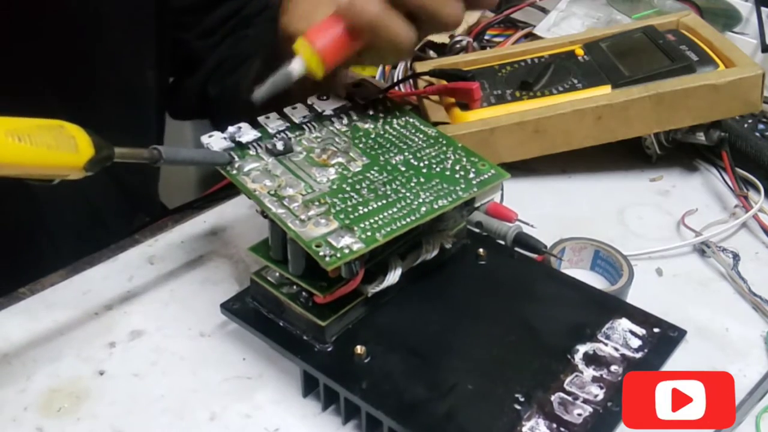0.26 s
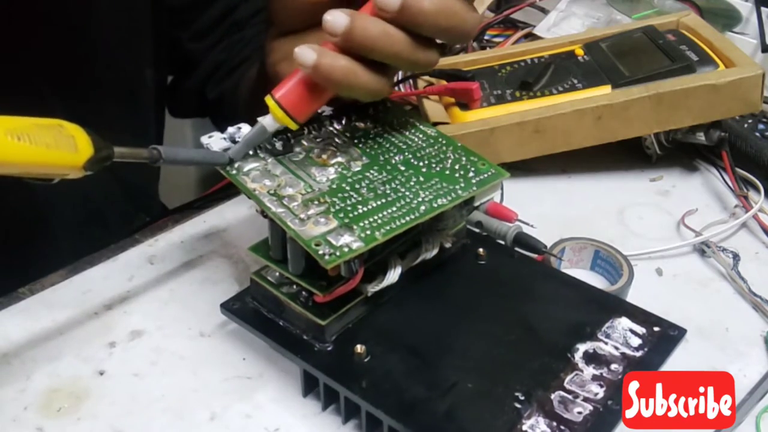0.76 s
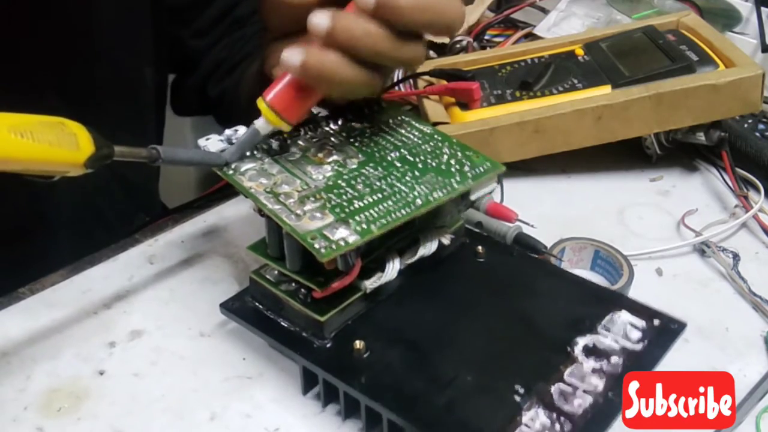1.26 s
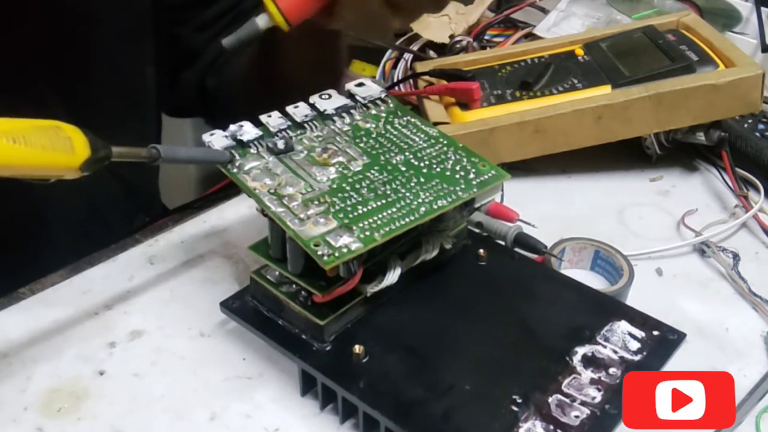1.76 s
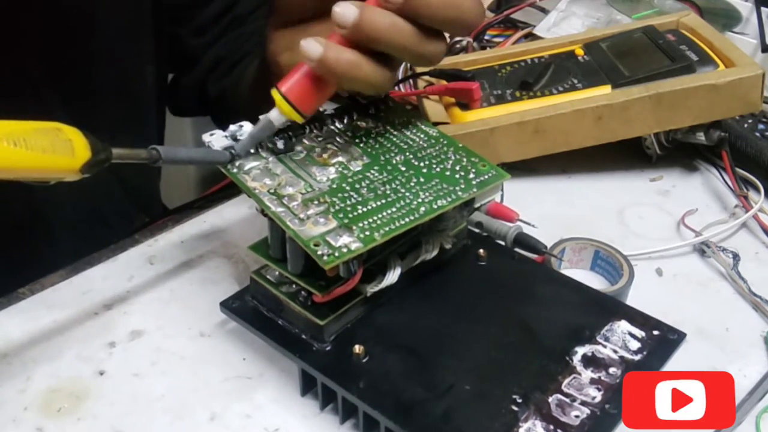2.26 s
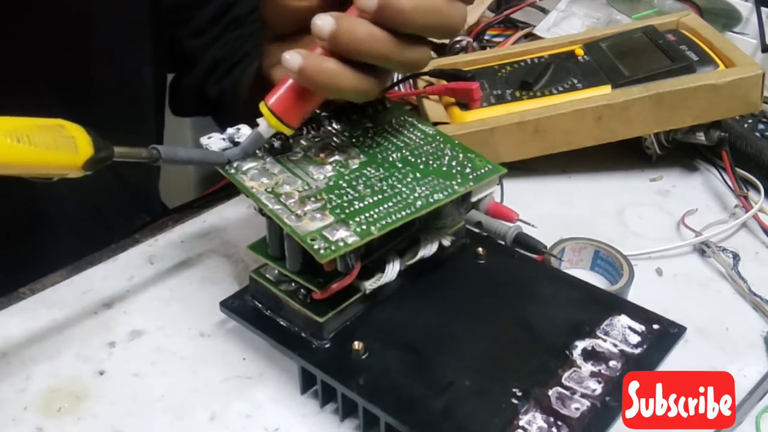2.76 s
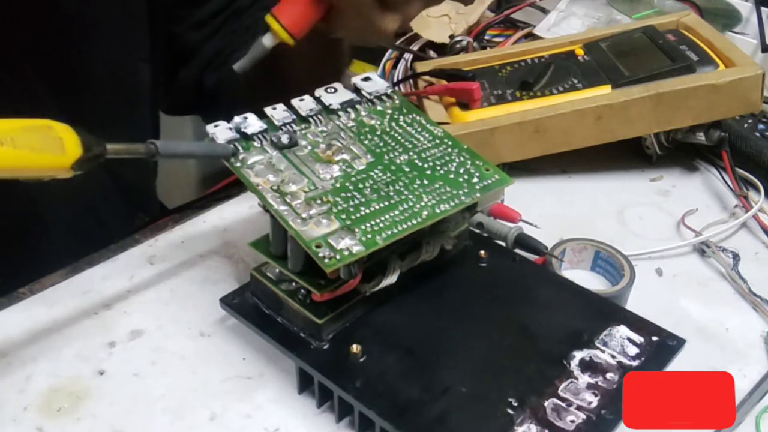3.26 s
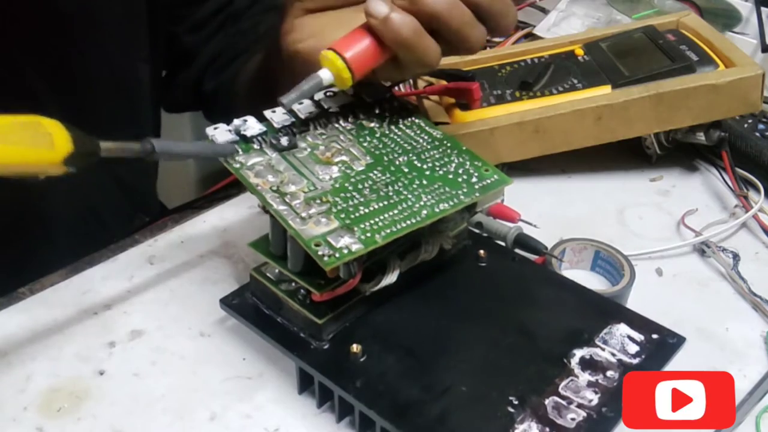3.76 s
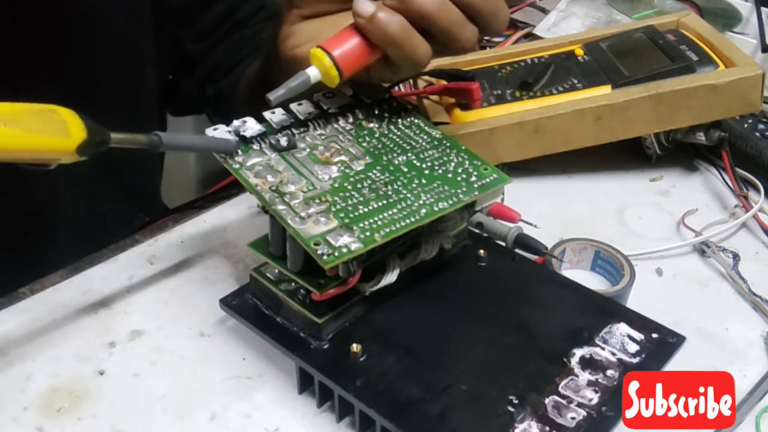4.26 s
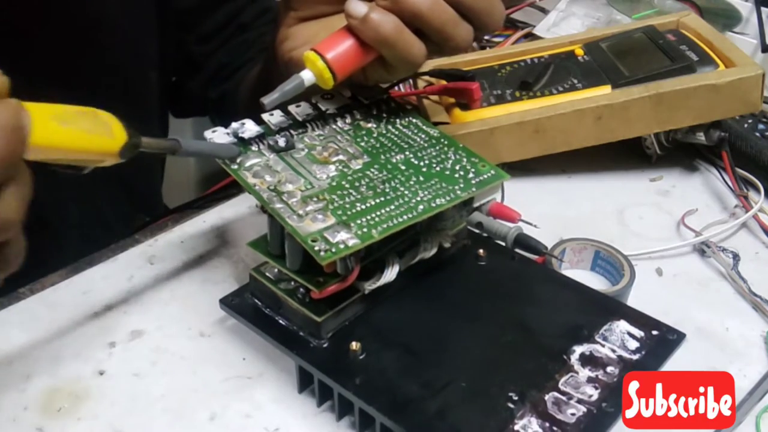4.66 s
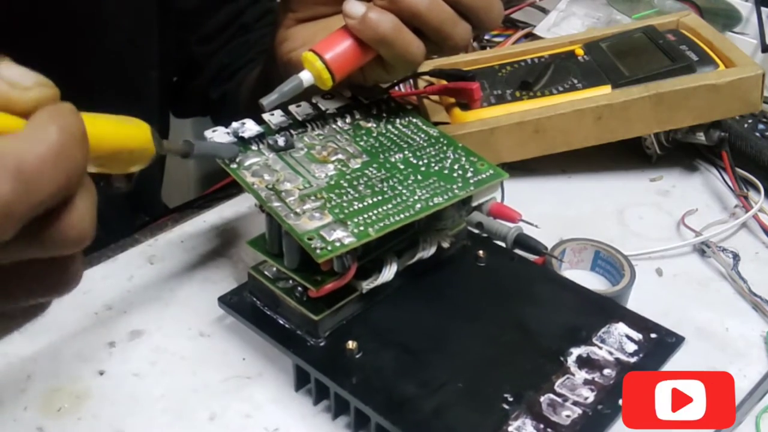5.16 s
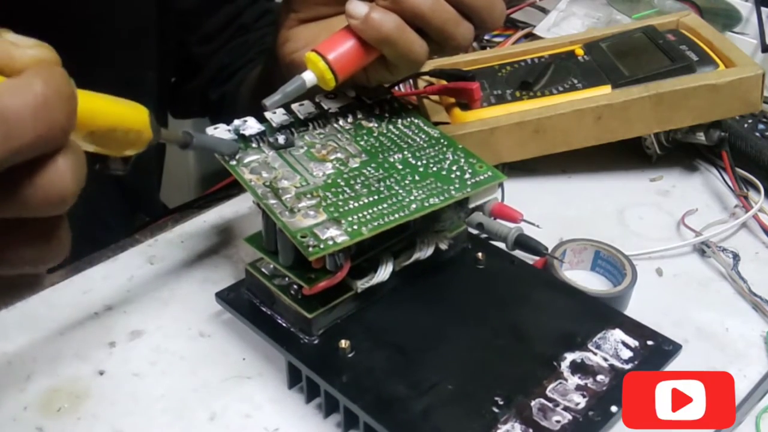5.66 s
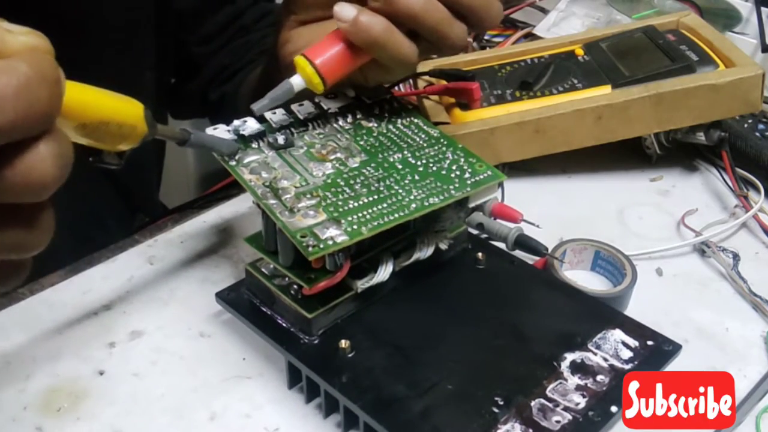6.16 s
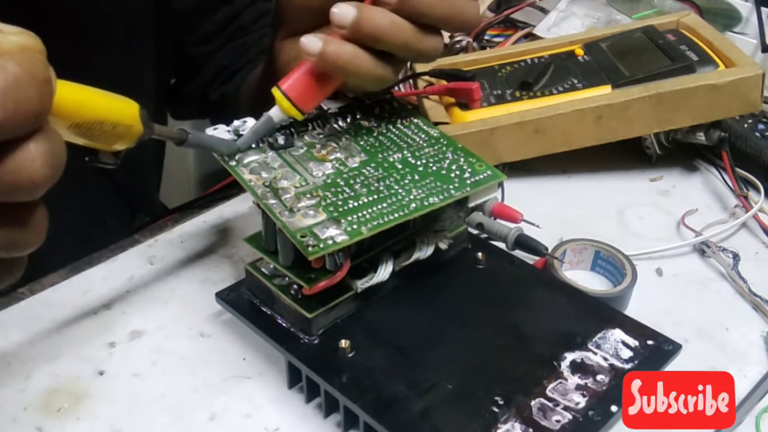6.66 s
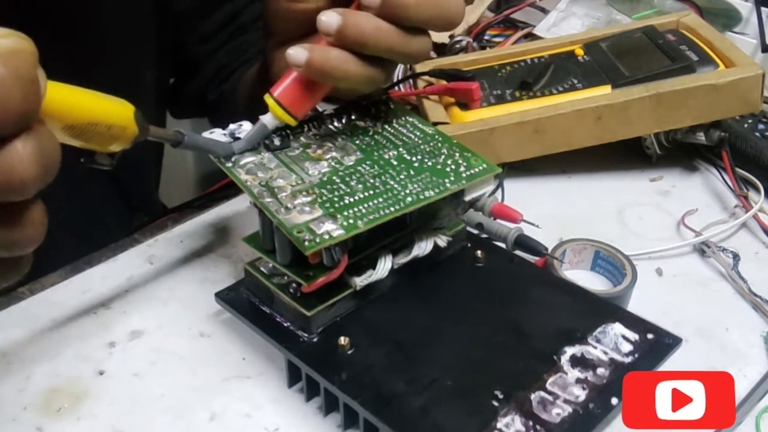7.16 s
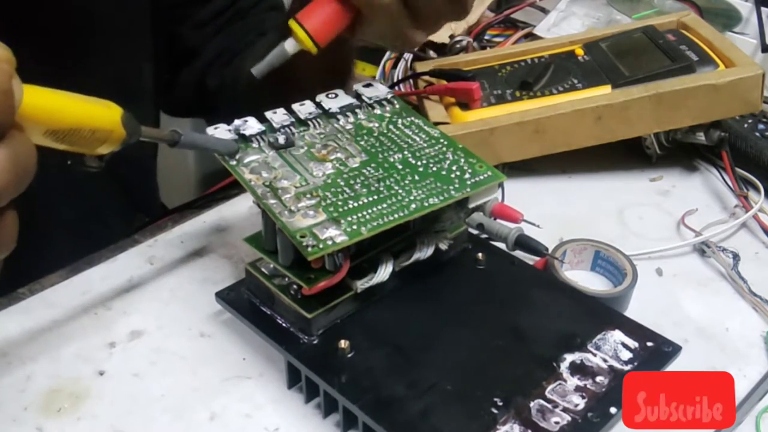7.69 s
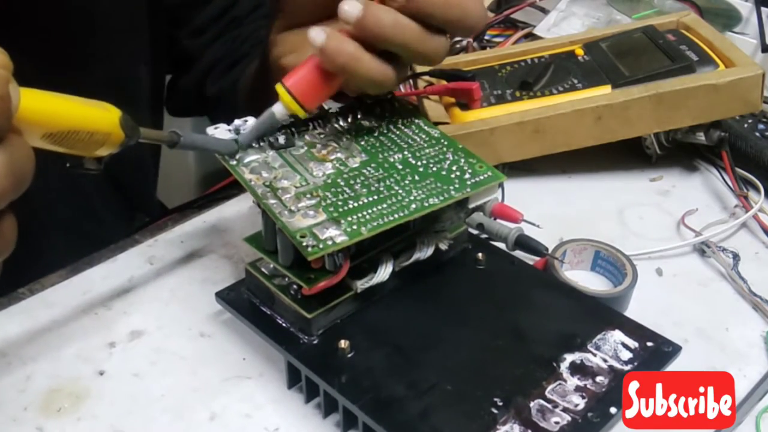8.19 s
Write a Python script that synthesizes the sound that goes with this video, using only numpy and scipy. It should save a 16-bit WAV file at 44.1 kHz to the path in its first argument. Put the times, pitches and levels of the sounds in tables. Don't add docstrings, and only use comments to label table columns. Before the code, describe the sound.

Close at a workbench in a small hard room, a spring-loaded solder pump snaps sharply as it is cocked, its plunger knocking back a moment later. Then come short air gulps, clanks and ringing metal fins, dull taps and scrapes on a circuit board. Quieter ticking and scraping fills the middle; late, a heavy thud and bright clank, then one last crack. Faint hum and fan hiss continue beneath, picked up by a nearby phone.

```python
import sys
import numpy as np
from scipy import signal
from scipy.fft import rfft, irfft, next_fast_len
from scipy.io import wavfile
from scipy.ndimage import uniform_filter1d

SR = 44100
rng = np.random.default_rng(int(sys.argv[2]) if len(sys.argv) > 2 else 0)


def volts_from_db(level):
    exponent = np.asarray(level, float) / 20
    return 10 ** exponent


def inscribe(sig):
    pcm = np.round(np.clip(np.atleast_2d(sig).T, -1, 1) * 32767)
    wavfile.write(sys.argv[1], SR, pcm.astype(np.int16))


N = 371763

# pitch_hz, level_db
HUM = [(97, -81.5), (199.2, -75.5), (298.8, -82.5), (398.4, -66), (597.6, -78.5)]
# pitch_hz, level_db
RUMBLE = [(25, -25), (50, -16.5), (90, -8), (190, -8), (300, -10.5), (500, -12.5), (800, -16), (1300, -19)]
# pitch_hz, level_db
HISS = [(1630, -18.5), (2290, -20), (2700, -14.5), (3220, -24), (4570, -23.5), (6000, -29), (8100, -34),
        (10000, -35.5), (12000, -24), (14900, -34), (16000, -27.5), (16500, -62)]
# pitch_hz, likeness_0_to_1
HISS_LIKENESS = [(60, 0), (130, 1), (290, 0.7), (640, 0), (1410, 0.05), (3100, 0.2), (6820, 0.05),
                 (15000, 0)]
# pitch_hz, left_minus_right_db
HISS_BALANCE = [(60, -0.5), (110, 0.5), (200, 3.5), (380, -1), (700, 0.5), (1290, 1), (2380, -0.5),
                (4400, 0), (8120, -0.5), (15000, 9.5)]
# time_s, treble_rise_db
RUSTLE = [
    (.3, 0.5),
    (1.699, 7.5),
    (4.6, 0.5),
    (8, 2.5),
]
HISS_DB, RUSTLE_S = -61, 0.29

# time_s, peak_1.5_to_7khz_db, peak_7_to_16khz_db, left_minus_right_db
LATCH_CRACKS = [
    (0.0444, -13, -18.5, -2),
    (1.7945, -16, -17, -8.5),
    (3.3912, -14.5, -17.5, -6),
    (7.82, -18, -18.5, -9.5),
]
# pitch_hz, level_db
LATCH_COLOUR = [(500, -15.5), (1200, -50), (2000, -32.5), (2600, -11.5), (3300, 4), (3900, -1.5),
                (4500, -4), (5100, -3), (5600, -12), (7000, -18), (8700, -10), (10500, -6), (11900, 1.5),
                (12800, -3), (14400, -2), (16000, -16.5)]
# level_db, pitch_hz, t60_s
LATCH_MODES = [(-3, 2900, .008), (5.5, 3250, .01), (8, 3600, 0.01), (4, 4050, 0.011), (2, 4750, 0.012),
               (-7, 6300, .008), (-9, 11900, .02)]
# level_db, pitch_hz, t60_s
LATCH_THUD, LATCH_KNOCK = (-20.5, 179, 0.065), (-15, 710, 0.0047)
LATCH_RINGS_S = 0.0012

# time_s, peak_db, peak_7_to_16khz_db
REBOUNDS = [
    (0.1405, -26.5, -32),
    (1.9075, -27, -29),
    (3.5098, -26, -32),
    (3.5125, -39, -33),
    (7.9316, -29, -41.5),
]
# level_db, pitch_hz, t60_s
REBOUND_THUD, REBOUND_KNOCK = (-22, 232, 0.137), (1, 527, 0.019)
REBOUND_PAN_DB = 7
THUD_LEADS_S = 0.006

# time_s, peak_1.5_to_7khz_db, peak_7_to_16khz_db
TICKS = [(0.1527, -38, -28), (0.297, -46, -39.5), (0.352, -52, -47), (0.411, -49, -40.5),
         (0.518, -46.5, -44), (0.54, -47.5, -39), (1.065, -22, -23.5), (2.6978, -25.5, -29),
         (2.702, -31, -28), (4.39, -51, -43), (4.6436, -31, -43), (5.39, -50, -50), (7.024, -48, -47),
         (7.0485, -23, -21.5), (7.0554, -28, -35), (7.9867, -41, -37.5), (8.073, -52, -45)]
# pitch_hz, level_db
TICK_COLOUR = [(290, -10), (500, -8), (729, -20), (1130, -11), (2540, -6.5), (3810, -5.5), (8090, -14),
               (11100, -3), (12100, -0.5), (14900, -1), (16000, -25.5)]
TICK_PAN_DB = -10.5

# time_s, peak_db, left_minus_right_db
TAPS = [(1.0432, -43, 6), (1.1485, -36, 3), (1.279, -37.5, 0), (1.4539, -35, -5), (2.769, -33.5, 8),
        (3.0804, -24, 0), (3.0905, -36, -2), (3.243, -31.5, 5), (3.2814, -35.5, 1), (3.704, -34, 0),
        (4.338, -48, 2), (4.7758, -41.5, 0), (4.8228, -32, -7), (4.8901, -39, 4), (4.9872, -43, 4),
        (5.941, -42.5, 6), (6.8946, -41, 2), (6.9058, -40.5, 10.5), (7.6556, -35, 2), (7.6906, -38, 4)]
TAP_TREBLE_DB = -13

# time_s, peak_1.5_to_7khz_db, peak_7_to_16khz_db
CLANKS = [(1.318, -18, -25), (1.3275, -27, -43), (1.3343, -22, -36), (1.349, -29.5, -49),
          (1.3734, -30, -32), (1.477, -30.5, -60), (1.622, -35.5, -75), (2.908, -30.5, -55.5),
          (2.9175, -15, -26), (2.923, -16, -40), (2.998, -15, -16.5), (3.0298, -24, -33),
          (3.1358, -30, -37.5), (3.1901, -22.5, -28.5), (3.7426, -21.5, -41), (7.2782, -31, -33),
          (7.2829, -10.5, -15.5), (7.4081, -31, -43)]
# pitch_hz, level_db
CLANK_COLOUR = [(300, -12), (800, -9), (1500, -6.5), (2200, -3), (3500, -2.5), (5500, 0), (7500, -9),
                (9000, -19.5), (10500, -12.5), (12000, -7.5), (13500, -16), (14800, -9), (16000, -17.5)]

# time_s, peak_db, pitch_hz
PUMP_THUDS = [(1.064, -32, 111.4), (1.076, -33.5, 151), (1.1465, -40.5, 150), (1.29, -30, 132),
              (1.309, -32, 188), (1.329, -28.5, 181), (1.472, -36, 166), (2.69, -41, 170),
              (2.708, -31.5, 147), (2.76, -39, 187), (2.795, -44.5, 181), (2.887, -31, 119),
              (2.916, -23.5, 181), (2.993, -33.5, 172), (3.078, -36, 152), (3.688, -41.5, 175),
              (3.703, -34, 127), (3.745, -36, 188.5), (6.901, -29.5, 316), (6.915, -38.5, 133),
              (7.047, -30.5, 127), (7.109, -39, 137), (7.244, -37, 166), (7.281, -33, 265.7),
              (7.649, -47.5, 143)]
# time_s, peak_db, pitch_hz
IRON_THUDS = [(4.339, -34, 223), (4.641, -36, 242), (4.695, -38, 240), (4.778, -46, 233), (4.825, -39, 242),
              (4.892, -31, 171), (4.949, -44.5, 192), (5.151, -43, 220), (5.212, -41.5, 207),
              (5.687, -48.5, 170), (5.935, -51, 192)]
# time_s, peak_db, pitch_hz
KNOCKS = [(1.0715, -24.5, 512), (1.084, -36, 497), (1.092, -37, 470), (1.124, -46, 590), (1.146, -44, 455),
          (1.279, -41.5, 503), (1.318, -30, 735), (1.62, -47, 1110), (2.7005, -33.5, 560),
          (2.768, -42.5, 450), (2.889, -46, 600), (2.915, -30.5, 603), (2.997, -37, 907), (3.187, -57, 603),
          (3.74, -34.5, 1120), (2.7843, -48, 1130), (4.388, -46.5, 1110), (4.603, -38, 1270),
          (4.632, -31.5, 450), (4.652, -30.5, 497), (4.675, -37.5, 438), (4.706, -42, 398),
          (4.727, -42, 400), (4.775, -39, 545), (4.822, -42.5, 453), (5.94, -44.5, 496), (6.898, -38, 650),
          (7.048, -28.5, 524), (7.057, -34.5, 460), (7.076, -43, 400), (7.104, -46, 905), (7.283, -24, 430),
          (7.689, -42.5, 1100)]
PUMP_CYCLES, IRON_CYCLES, KNOCK_T60_S = 14.6, 17.8, 0.04
# time_s, peak_db, pitch_hz, t60_s
SLAM = [
    (7.2833, -9.5, 225, 0.048),
    (7.2833, -19.5, 192.8, 0.15),
]
# time_s, peak_db
TIP_FLICKS = [(2.7846, -33.5), (2.7935, -40), (2.8045, -49), (4.6034, -44), (4.6463, -30.5),
              (7.1092, -29.5), (7.114, -43), (7.119, -34), (7.2823, -18), (7.4086, -35.5)]
TIP_HZ, TIP_T60_S, TIP_LAGS_S = 2068, 0.037, 0.001
CLIP_HZ = [10600, 6535, 4190, 5600, 14810, 7250, 8400, 11610, 4600]
# time_s, peak_db, t60_s
CLIPS = [
    [(1.374, -37.5, 0.16), (2.93, -52, .2), (3.003, -45, .2), (3.03, -36, .2), (3.189, -36, 0.041),
     (3.743, -42.5, 0.11)],
    [(2.917, -46, .2), (3.081, -37, .12), (7.283, -40, 0.56)],
    [(1.319, -52, 0.088), (2.998, -39, 0.14), (7.283, -16.5, 0.032)],
    [(7.285, -32, .15), (1.322, -38, .12), (2.92, -38, .1)],
    [(1.319, -47, .13), (2.9965, -13, 0.036), (3.002, -31, 0.13), (3.14, -55, 0.11)],
    [(2.925, -45, .09), (3.03, -50, .2)],
    [(1.319, -40, 0.066), (2.92, -44, .16), (3.0, -43, 0.22), (3.081, -50, .15), (7.284, -57, 0.13)],
    [(2.935, -43.5, 0.24), (3.137, -50, .08)],
    [(1.521, -41, 0.044), (1.477, -49, .04)],
]

# pitch_hz, t60_s, level_db
ROOM = [(152, 0.23, -2.5), (470, 0.25, -2.5), (1500, 0.18, -2.5), (3960, 0.46, -20), (8000, 0.25, -5.5),
        (12940, 0.073, -3.5)]
FINS_ROOM_DB = -22

# time_s, level_db
WHINE = [
    (.9, -76),
    (2.6, -79),
    (6.1, -76),
]
WHINE_HZ, WHINE_S = 6100, 0.15

# opens_s, fastest_s, stops_s, level_db, whistle_db
GULPS = [
    (1.06, 1.06, 1.146, -38, -12),
    (2.675, 2.696, 2.78, -38, -11),
    (7.019, 7.052, 7.125, -34.5, -15.5),
]
# pitch_hz, level_db
GULP_COLOUR = [(590, -22.5), (1000, -2.5), (1160, -1.5), (1790, -12), (2030, -4), (3980, 5), (9060, -10),
               (14600, -12), (16000, -5)]
RATTLE_DB = -5

# left_minus_right_db, left_leads_radians,
# then corner_db, flank_db, fin_edge_db, base_db, foot_db, fin_tip_db when struck there
FIN_MODES = [(-7.5, 0.13, -41, -36, -31, -37, -44, -50), (5, 1.2, -53, -50, -30.5, -61, -46, -41),
             (-6, 0.52, -54, -47, -29.5, -33, -39, -57), (5, 0.33, -58, -56, -40, -45, -58, -60),
             (3.5, 0.56, -39, -36.5, -26, -33.5, -54, -57), (1, 1.5, -60, -43, -45, -58, -50, -58),
             (-14, -1.5, -52, -48, -37, -38, -44, -55), (-3, 0.2, -61, -50, -35, -54, -48, -55),
             (-8, 0.1, -60, -57, -51, -50, -52, -74), (4.5, 1.8, -44, -48, -42, -60, -71, -55),
             (15, 1.6, -62, -55, -35.5, -63.5, -63, -48), (14, -1.7, -46, -54, -38, -61, -47, -49),
             (14, -0.21, -59, -61, -23, -76, -45, -38), (4.5, 1.1, -59, -58, -44, -80, -62, -54)]
FIN_HZ = [4910, 5012, 5085, 5405, 5657, 6380, 6595, 6654, 7983, 9790, 9848, 12058, 12113, 14845]
FIN_T60 = [0.38, 0.27, 0.49, 0.21, 0.34, 0.22, 0.37, 0.22, 0.65, 0.42, 0.78, 0.19, 0.31, 0.16]
# time_s, strength_db, muted_after_s (by a hand or tool)
BLOWS = [
    [(1.318, 0, 0.25), (1.476, -18.5, .14), (1.621, -25, 0.06)],
    [(2.917, 1.5, 0.075)],
    [(2.998, -1, 0.11)],
    [(3.7, -31, .04), (3.743, -0.3, .5)],
    [(7.283, 1, 0.12), (7.408, -23.5, 0.13)],
    [(3.136, -1.7, .07)],
]
SPOT_SHARES = [0.75, 0.9, 0.98, 1.05, 0.66, .9]
BUZZ_DB, BUZZ_PER_S = 2, 110

# start_s, hardest_s, end_s, scrape_db, rumble_db
DRAGS = [
    (2.923, 2.997, 3.34, -48.5, -49),
    (3.674, 3.706, 3.57, -53.5, -46.5),
    (4.382, 4.57, 4.807, -48.5, -43.5),
    (4.77, 4.963, 5.3, -66, -60.5),
    (7.613, 7.708, 7.9, -59, -53.5),
]
# pitch_hz, level_db
BOARD_COLOUR = [(500, -15), (800, -10.5), (1300, -8.5), (1700, -6), (2100, -1.5), (2800, -5), (3600, -6.5),
                (4600, -12.5), (5200, -15.5), (9000, -27.5), (16000, -25.5)]
STROKE_ENDS_DB, RUMBLE_LAG = -16.5, 0.58

# pitch_hz, left_minus_right_db
PORT_BALANCE = [(100, 2), (300, 0.5), (1500, 3), (2500, 0), (3600, -1.5), (5000, -6), (7000, -5.5),
                (9000, 6), (11000, 20.5), (13000, 25), (15500, 5)]
# pitch_hz, left_leads_radians
PORT_LEAD = [(100, 0.2), (500, 0.35), (1300, 1.59), (2500, 1.89), (3400, 1.55), (4700, 2), (6300, 5),
             (7500, 4), (9500, 8), (12000, 3.2), (16000, 3)]


def table(points, size):
    hz, value = np.transpose(points)[:2]
    return np.interp(np.log(np.fft.rfftfreq(size, 1 / SR) + 1), np.log(hz), value)


def colour(x, points):
    y = irfft(rfft(x) * volts_from_db(table(points, x.shape[-1])), x.shape[-1])
    return y / y.std(axis=-1, keepdims=True)


def band(x, lo_hz, hi_hz):
    y = signal.sosfilt(signal.butter(2, [lo_hz, hi_hz], "band", fs=SR, output="sos"), x)
    return y / y.std(axis=-1, keepdims=True)


def walk(rate):
    k = int(SR / rate)
    steps = np.repeat(rng.standard_normal(N // k + 1), k)
    y = uniform_filter1d(uniform_filter1d(steps, k), k)[:N]
    return y / y.std()


def click(points, size):
    fold = irfft(np.log(volts_from_db(table(points, size))), size)
    fold[1:size // 2] *= 2
    fold[size // 2 + 1:] = 0
    return irfft(np.exp(rfft(fold)), size)


def add(out, x, s, pan_db):
    i = int(s * SR)
    x = x[:N - i]
    out[:, i:i + len(x)] += x * volts_from_db(np.array([[pan_db], [-pan_db]]) / 2)


def follows(events, rule, early_s=0):
    return [(e[0] - early_s, e[1] + rule[0], *rule[1:]) for e in events]


def background():
    size, t = next_fast_len(N), np.arange(N) / SR
    like = np.clip(table(HISS_LIKENESS, size), 0, 1)
    mid, side = rfft(rng.standard_normal((2, size))) * np.sqrt([1 + like, 1 - like])
    lean = table(HISS_BALANCE, size) / 2
    both = np.array([(mid + side) * volts_from_db(lean), (mid - side) * volts_from_db(-lean)])
    both *= volts_from_db(table(RUMBLE + HISS, size))
    both *= volts_from_db(HISS_DB) / irfft(both.mean(0), size).std()

    rustle_db = sum(db * np.exp(-((t - s) / RUSTLE_S) ** 2) for s, db in RUSTLE)
    octave = np.log2(np.fft.rfftfreq(size, 1 / SR) / 30 + 1e-9)
    swell, out = walk(1.5), 0
    for k in range(10):
        share = np.cos(np.clip(octave - k, -1, 1) * np.pi / 2) ** 2
        breath_db = 0.5 * swell + 1.9 * walk(15)
        treble = np.clip((k - 5) / 2, 0, 1)
        out = out + irfft(both * share, size)[:, :N] * volts_from_db(breath_db + treble * rustle_db)

    drift = 0.25 * walk(1)
    for hz, db in HUM:
        level = np.sqrt(2) * volts_from_db(db + 0.23 * walk(2.7))
        out = out + level * np.sin(hz * (2 * np.pi * t + drift / 400))
    return out


def cracks(events, points, gain_db, contact_ms, chatter_db, chatter_ms, creep_db, click_db, treble_share=1):
    out, size = np.zeros((2, N)), 8192
    ms = np.arange(size) / SR * 1000 - 5
    noise = colour(rng.standard_normal((len(events), size)), points)
    sounds = np.vstack([noise, np.roll(click(points, size), 225)])
    low = signal.sosfilt(signal.butter(4, 7000, fs=SR, output="sos"), sounds)
    high = signal.sosfilt(signal.butter(4, 7000, "high", fs=SR, output="sos"), sounds)
    low_click, high_click = [volts_from_db(click_db) * c / abs(c).max() for c in (low[-1], high[-1])]

    after = np.maximum(ms, 0)
    creep = volts_from_db(creep_db) * np.exp(np.minimum(ms, 0) / 2.2)
    release = np.minimum(after / 0.15, 1) * np.exp(-(after / contact_ms) ** 1.5)
    burst = np.where(ms > 0, release, creep)
    chatter = volts_from_db(chatter_db) * np.exp(-after / chatter_ms) * (1 - np.exp(-after))
    dulling = np.exp(-after / chatter_ms * (1 / treble_share - 1))
    ragged = volts_from_db(1.6 * walk(180))
    for (s, low_db, high_db, pan_db), a, b in zip(events, low, high):
        shape = (burst + chatter * ragged[int(s * SR) - 300:][:size]) * volts_from_db(gain_db)
        dull_part = volts_from_db(low_db) * (shape * a / a.std() + low_click)
        bright_part = volts_from_db(high_db) * (shape * dulling * b / b.std() + high_click)
        add(out, dull_part + bright_part, s - 0.005, pan_db)
    return out


def knocks(events, gain_db, push_cycles, split, upper_db, rough, spread):
    out, t = np.zeros((2, N)), np.arange(SR // 3) / SR
    for (s, db, hz, t60), chance in zip(events, rng.random((len(events), 2))):
        ring = np.sin(2 * np.pi * hz * t)
        upper_hz = hz * (split + 0.3 * chance[0])
        ring += (
            volts_from_db(upper_db) * np.sin(2 * np.pi * (hz * (split + 0.3 * chance[0]) * t + chance[1])))
        shaking = band(rng.standard_normal(len(t)), hz / spread, hz * spread)
        ring += rough * shaking * np.minimum(t * hz / 3, 1)
        push = 1 - np.exp(-t * hz / push_cycles)
        fade = volts_from_db(db + gain_db - 60 * t / max(t60, 0.01))
        add(out, fade * push * ring, s - 0.35 * push_cycles / hz - 0.001, 0)
    return out


def room(x):
    t, echo = np.arange(SR // 2) / SR, 0
    for hz, t60, db in ROOM:
        tail = band(rng.standard_normal((2, len(t))), hz / 1.93, min(hz * 1.85, 18000))
        tail = tail * volts_from_db(-60 * t / t60) * np.minimum(t / 0.0046, 1)
        tail[1] += np.clip(1 - hz / 900, 0, 1) * (tail[0] - tail[1])
        echo = echo + volts_from_db(db) * tail * np.sqrt(hz / SR / (tail ** 2).sum(axis=1, keepdims=True))
    return signal.fftconvolve(x[None], echo, axes=1)[:, :N]


def whine():
    t = np.arange(N) / SR
    swell = sum(volts_from_db(db) * np.exp(-((t - s) / WHINE_S) ** 2) for s, db in WHINE)
    return swell * band(rng.standard_normal((2, N)), WHINE_HZ / 1.03, WHINE_HZ * 1.03)


def gulps():
    t, noise = np.arange(N) / SR, rng.standard_normal((3, N))
    air = colour(noise[0], GULP_COLOUR) * volts_from_db(2.5 * walk(200))
    whistle = band(noise[1], 13500, 16000)
    rattle = band(noise[2], 250, 570)
    out = 0
    for opens, fastest, stops, db, whistle_db in GULPS:
        times = [opens - 0.005, opens, fastest, stops, stops + 0.03]
        flow = volts_from_db(db + np.interp(t, times, [-71.5, -20.0, -1.0, -18.0, -72]))
        late = volts_from_db(np.interp(t, [fastest, stops], [0, 8]))
        out = out + flow * (air + volts_from_db(whistle_db) * late * whistle + volts_from_db(RATTLE_DB) * (t > fastest) * rattle)
    return out


def fins():
    out, modes = np.zeros((2, N)), np.array(FIN_MODES)
    buzz = volts_from_db(BUZZ_DB * walk(BUZZ_PER_S))
    hz, t60 = np.array(FIN_HZ)[:, None], np.array(FIN_T60)[:, None]
    lean, lead = modes[:, :1] / 2, modes[:, 1:2] / 2
    left = np.sqrt(2 / (1 + volts_from_db(-4 * lean)))
    right = np.sqrt(2 / (1 + volts_from_db(4 * lean)))
    for struck_db, share, blows in zip(modes[:, 2:].T[..., None], SPOT_SHARES, BLOWS):
        for s, db, free in blows:
            t = np.arange(int((max(free, 0) + 0.16) * SR)) / SR
            turn = 2 * np.pi * (hz * t + rng.random(hz.shape))
            gain = volts_from_db(db + struck_db - 60 * (t - 0.034) / (t60 * share))
            gain *= buzz[rng.integers(0, N // 2, hz.shape) + np.arange(len(t))]
            mute = np.minimum(t / 0.0011, 1) * volts_from_db(-250 * np.maximum(t - free, 0))
            i = int(s * SR)
            out[0, i:i + len(t)] += mute * (gain * left * np.sin(turn + lead)).sum(0)
            out[1, i:i + len(t)] += mute * (gain * right * np.sin(turn - lead)).sum(0)
    return out


def drag():
    t, scrape, shake = np.arange(N) / SR, 0, 0
    shape = [-60, STROKE_ENDS_DB, 0, STROKE_ENDS_DB, -60]
    for start, hardest, end, db, rumble_db in DRAGS:
        scrape = scrape + volts_from_db(db + np.interp(t, [start - 0.01, start, hardest, end, end + 0.02], shape))
        late = hardest + RUMBLE_LAG * (end - hardest)
        shake = shake + volts_from_db(rumble_db + np.interp(t, [start - 0.01, start, late, end, end + 0.021], shape))
    grains = rng.standard_normal(N) * volts_from_db(2.5 * walk(200))
    rumble = band(rng.standard_normal(N), 137, 490)
    return volts_from_db(2.5) * scrape * colour(grains, BOARD_COLOUR) + volts_from_db(-5.5) * shake * rumble


def ports(x):
    size = next_fast_len(N + 4096)
    side = volts_from_db(table(PORT_BALANCE, size) / 2) * np.exp(0.5j * table(PORT_LEAD, size))
    return irfft(rfft(x, size) * np.array([side, 1 / side]), size)[:, :N]


def all_cracks():
    ticks = [(*e, TICK_PAN_DB) for e in TICKS] + [(*e, REBOUND_PAN_DB) for e in REBOUNDS]
    taps = [(s, db, db + TAP_TREBLE_DB, pan_db) for s, db, pan_db in TAPS]
    clanks = [(*e, 0) for e in CLANKS]
    out = cracks(LATCH_CRACKS, LATCH_COLOUR, gain_db=-4.5, contact_ms=3.16, chatter_db=-9, chatter_ms=23,
                 creep_db=-15, click_db=-18)
    out += cracks(ticks, TICK_COLOUR, gain_db=-7.5, contact_ms=2.2, chatter_db=-12, chatter_ms=4.8,
                  creep_db=-9, click_db=-3.5)
    out += cracks(taps, BOARD_COLOUR, gain_db=-8, contact_ms=1.2, chatter_db=-8, chatter_ms=20,
                  creep_db=-6, click_db=-2)
    out += cracks(clanks, CLANK_COLOUR, gain_db=-4.5, contact_ms=2, chatter_db=-11, chatter_ms=20.48,
                  creep_db=-14.5, click_db=-6.5, treble_share=0.3)
    return out


def all_knocks():
    thuds = [(*e, PUMP_CYCLES / e[2]) for e in PUMP_THUDS] + [(*e, IRON_CYCLES / e[2]) for e in IRON_THUDS]
    thuds += follows(LATCH_CRACKS, LATCH_THUD, THUD_LEADS_S) + follows(REBOUNDS, REBOUND_THUD, THUD_LEADS_S)
    raps = [(*e, KNOCK_T60_S) for e in KNOCKS]
    raps += follows(LATCH_CRACKS, LATCH_KNOCK) + follows(REBOUNDS, REBOUND_KNOCK)
    latch_rings = []
    for mode in LATCH_MODES:
        latch_rings += follows(LATCH_CRACKS, mode, -LATCH_RINGS_S)
    clips = [(s, db, hz, t60) for hz, part in zip(CLIP_HZ, CLIPS) for s, db, t60 in part]
    out = knocks(thuds, 1.7, push_cycles=0.8, split=1.3, upper_db=-14, rough=0.77, spread=1.87)
    out += knocks(raps, -1.5, push_cycles=0.43, split=1.3, upper_db=-14, rough=0.73, spread=1.8)
    out += knocks(SLAM, 0.1, push_cycles=0.49, split=1.5, upper_db=-13.5, rough=0.24, spread=1.67)
    out += knocks(latch_rings, -3, push_cycles=0.6, split=1.02, upper_db=-20, rough=0.2, spread=1.1)
    out += knocks(clips, 0, push_cycles=3, split=1.01, upper_db=-30, rough=0.4, spread=1.02)
    return out


def tip_flicks():
    flicks = follows(TIP_FLICKS, (0, TIP_HZ, TIP_T60_S), -TIP_LAGS_S)
    return knocks(flicks, -1.2, push_cycles=0.52, split=0.93, upper_db=-8, rough=0.8, spread=1.32)


def scene():
    near = all_cracks() + all_knocks() + gulps() + drag()
    metal = fins()
    echoes = room(near.mean(0) + volts_from_db(FINS_ROOM_DB) * metal[0])
    return ports(near + tip_flicks()) + metal + echoes + background() + whine()


def low_pass(x):
    return signal.sosfilt(signal.butter(12, 16650, fs=SR, output="sos"), x)


def record(dry):
    dry = 0.9 * np.tanh(dry / 0.9)
    dry = signal.sosfilt(signal.butter(2, 60, "high", fs=SR, output="sos"), dry)
    dry = signal.sosfilt(signal.cheby2(12, 35, 15950, fs=SR, output="sos"), dry)
    return low_pass(dry)


dry = scene()
out = record(dry)
inscribe(out)
```